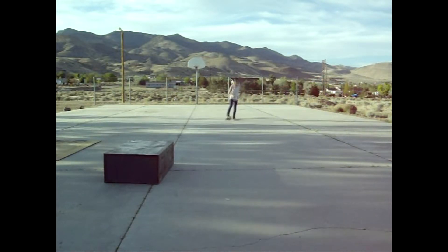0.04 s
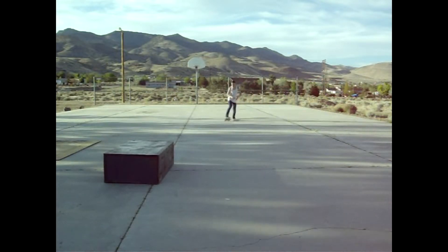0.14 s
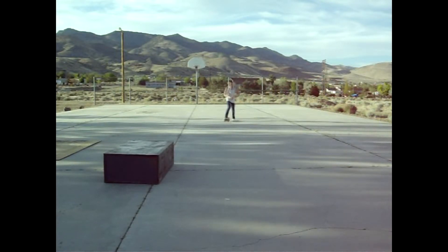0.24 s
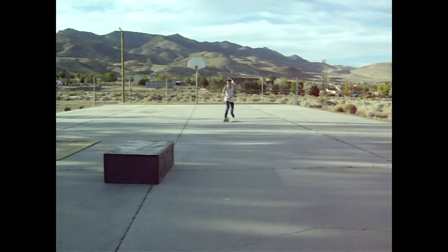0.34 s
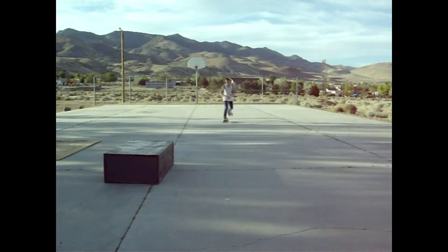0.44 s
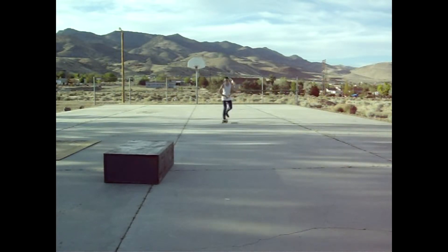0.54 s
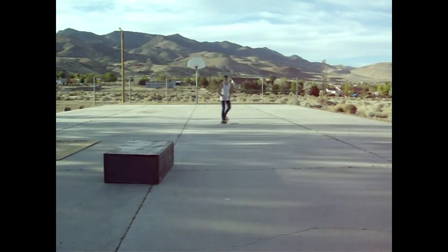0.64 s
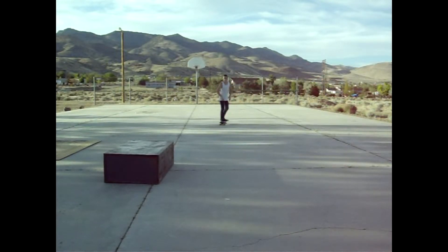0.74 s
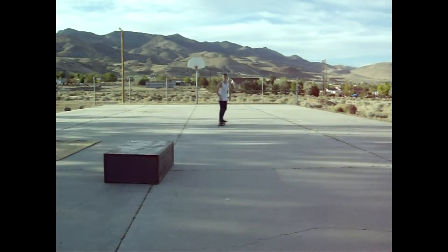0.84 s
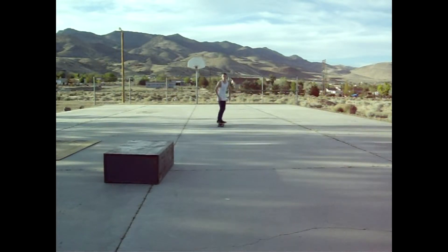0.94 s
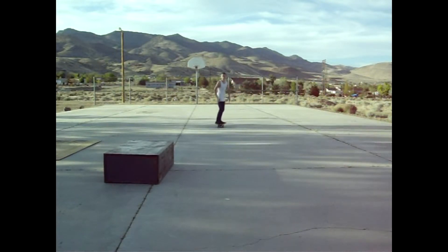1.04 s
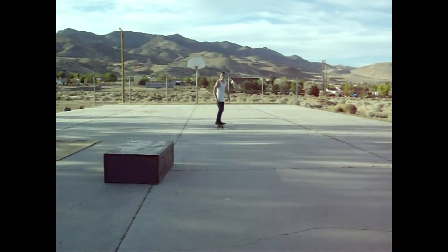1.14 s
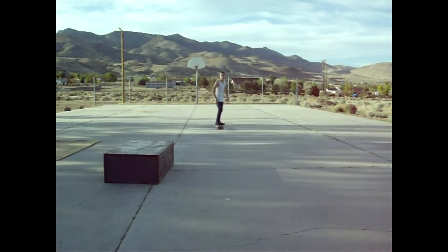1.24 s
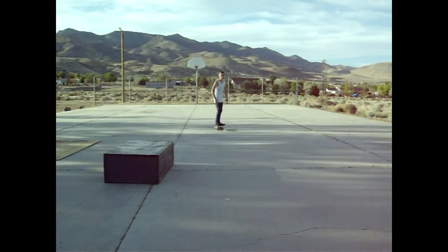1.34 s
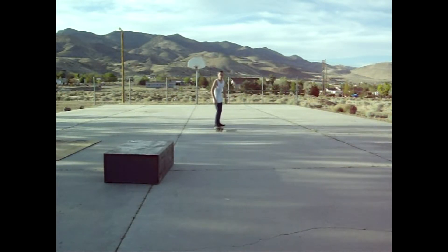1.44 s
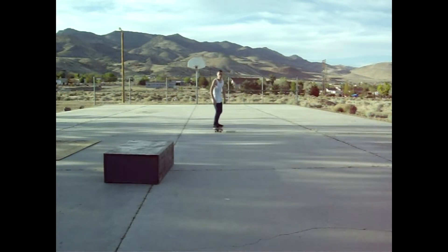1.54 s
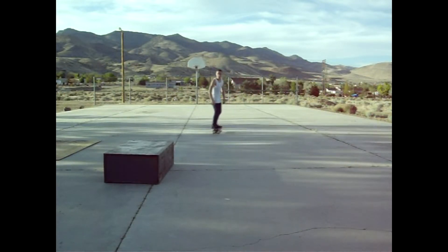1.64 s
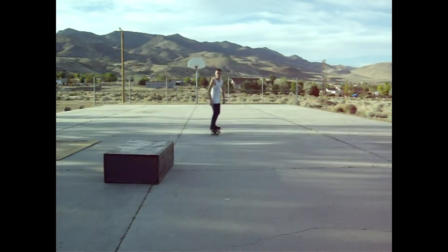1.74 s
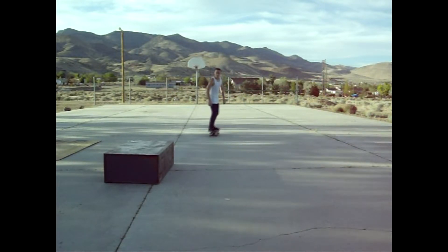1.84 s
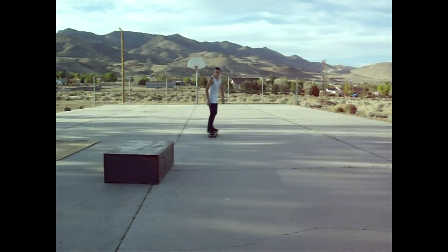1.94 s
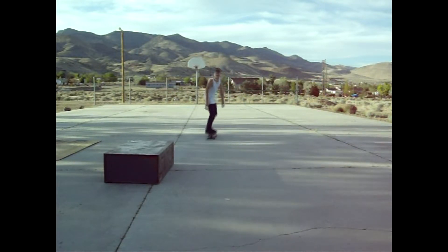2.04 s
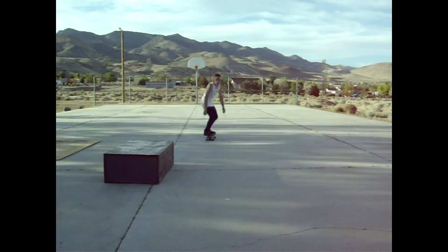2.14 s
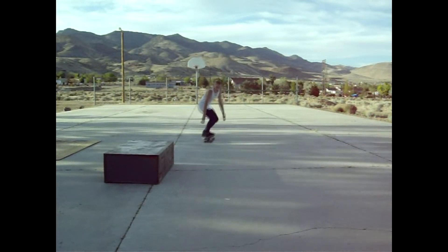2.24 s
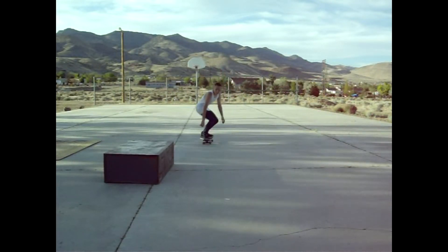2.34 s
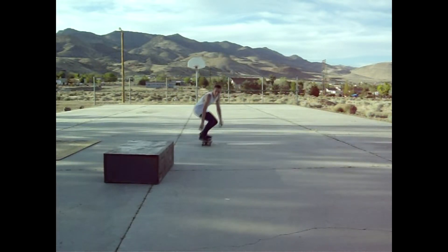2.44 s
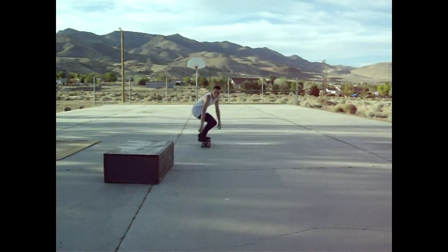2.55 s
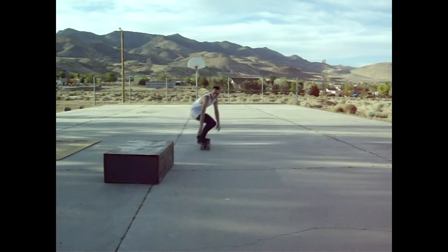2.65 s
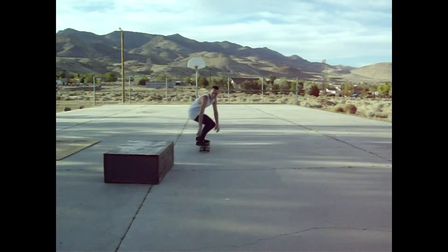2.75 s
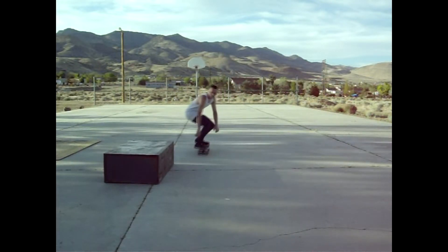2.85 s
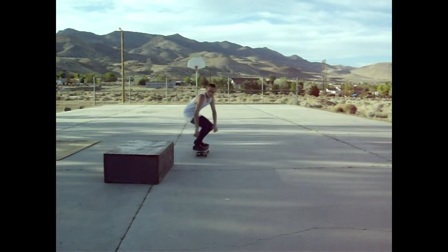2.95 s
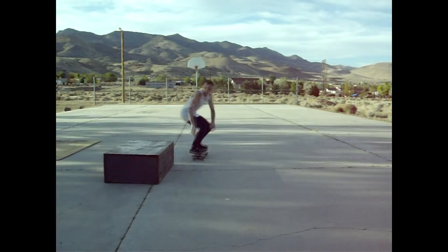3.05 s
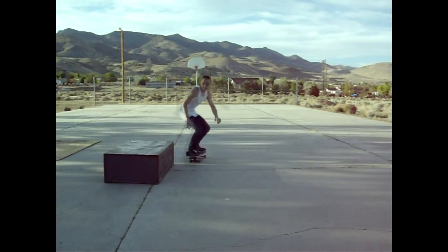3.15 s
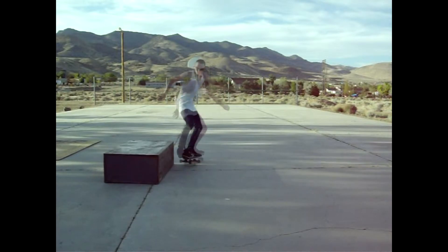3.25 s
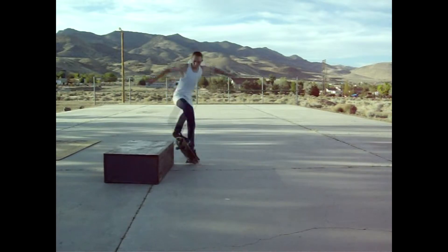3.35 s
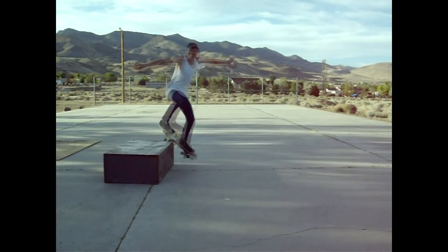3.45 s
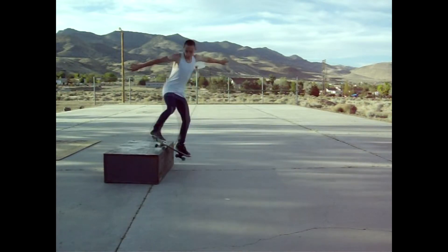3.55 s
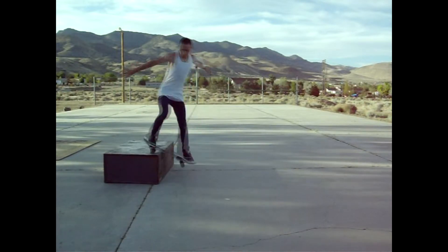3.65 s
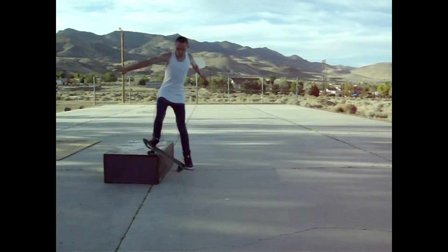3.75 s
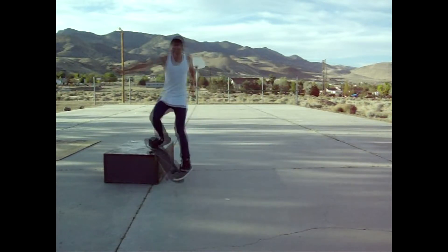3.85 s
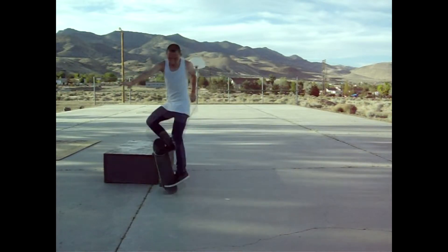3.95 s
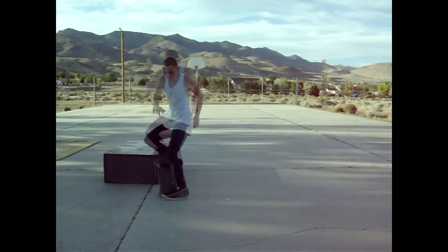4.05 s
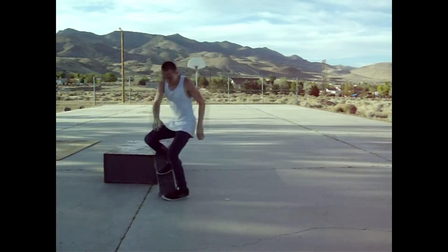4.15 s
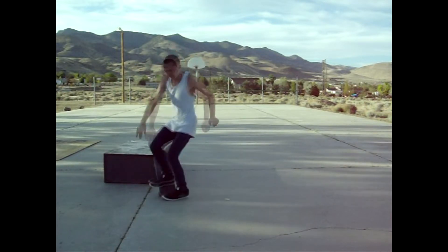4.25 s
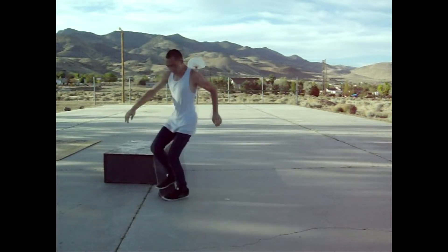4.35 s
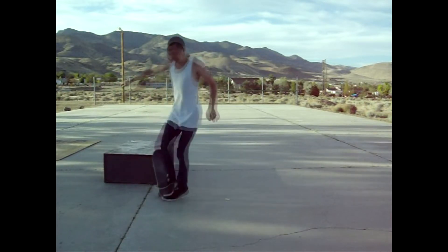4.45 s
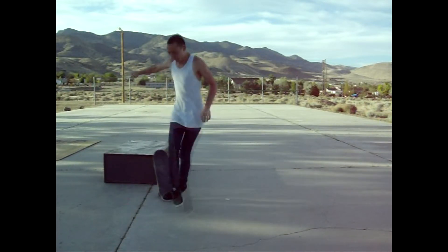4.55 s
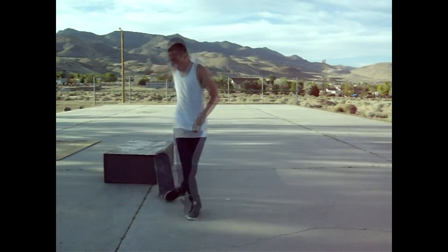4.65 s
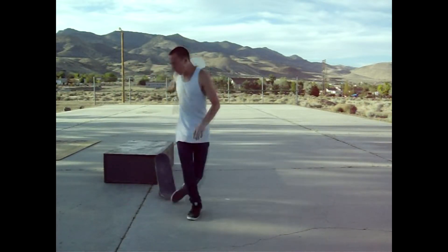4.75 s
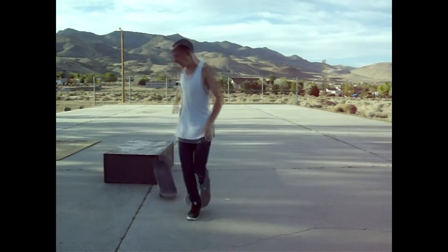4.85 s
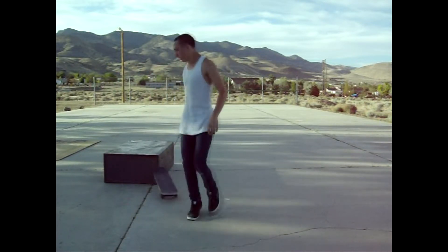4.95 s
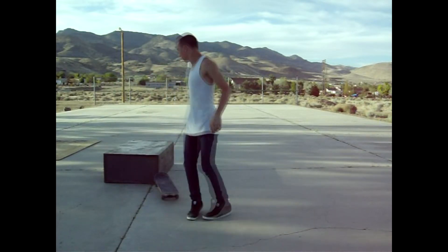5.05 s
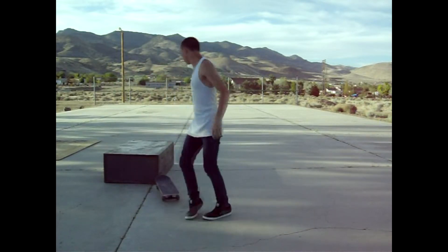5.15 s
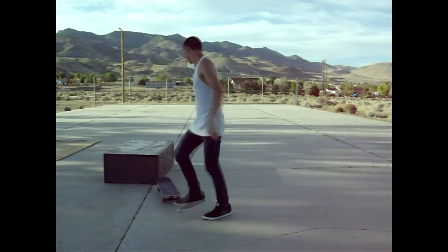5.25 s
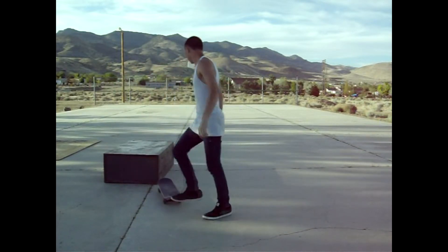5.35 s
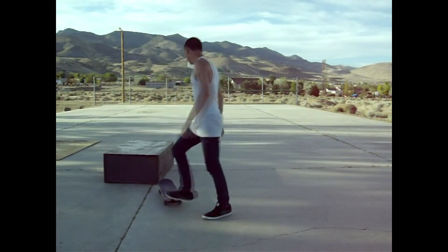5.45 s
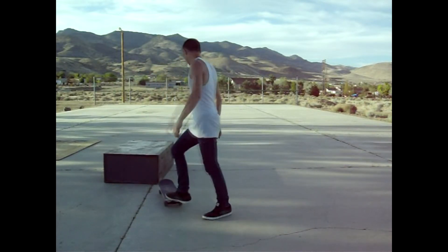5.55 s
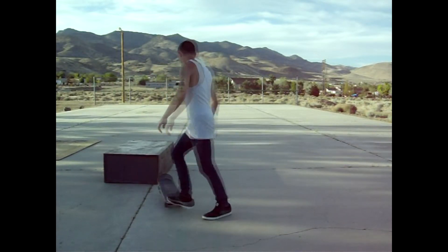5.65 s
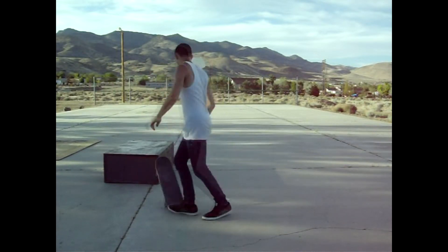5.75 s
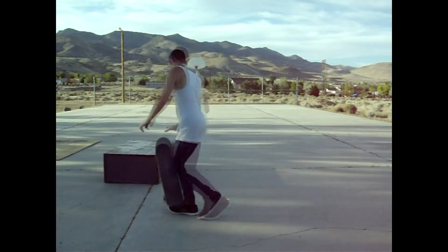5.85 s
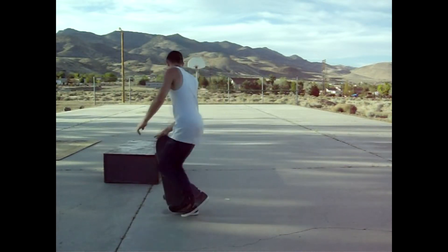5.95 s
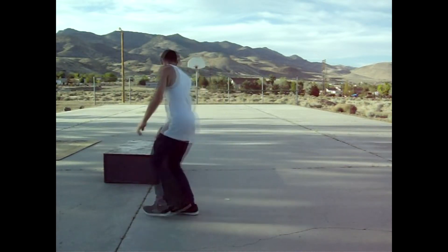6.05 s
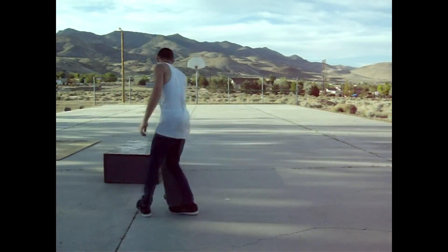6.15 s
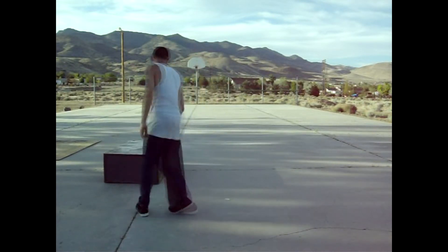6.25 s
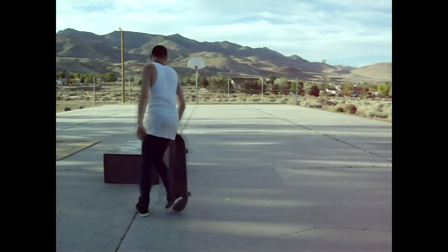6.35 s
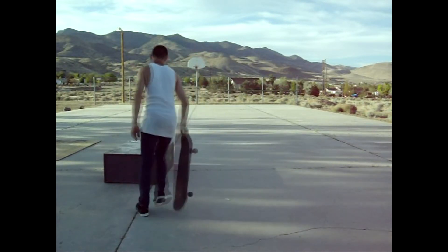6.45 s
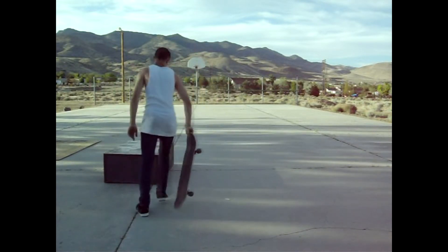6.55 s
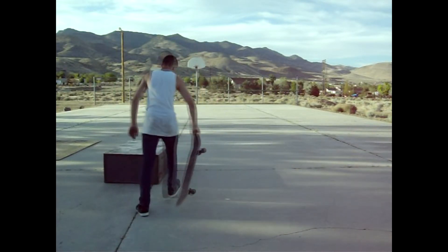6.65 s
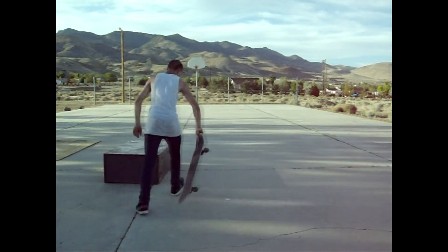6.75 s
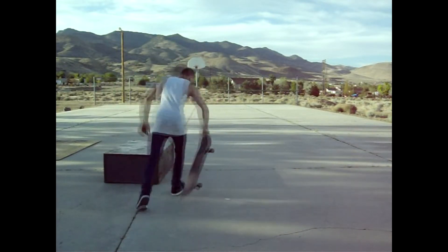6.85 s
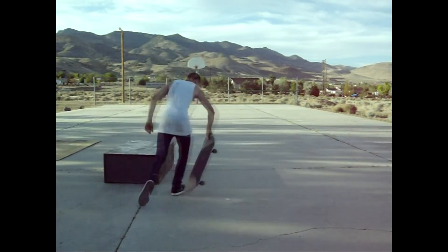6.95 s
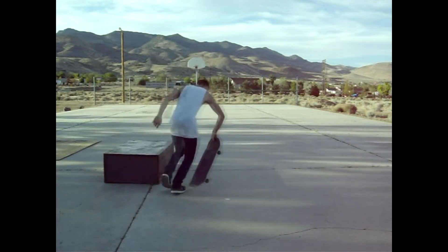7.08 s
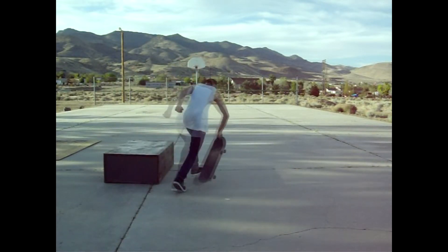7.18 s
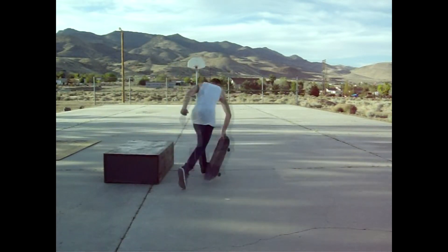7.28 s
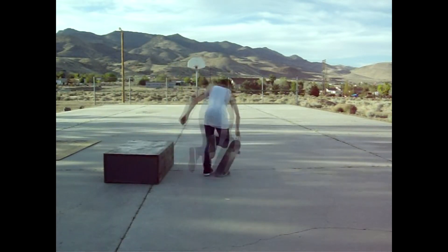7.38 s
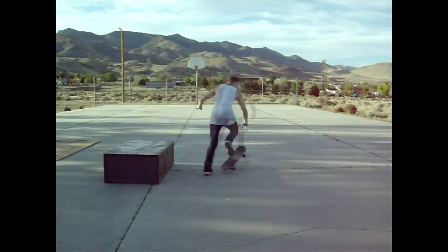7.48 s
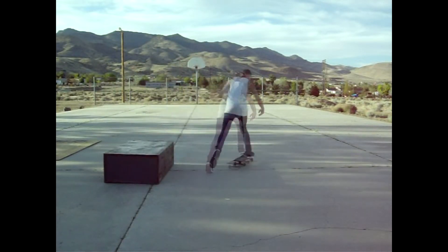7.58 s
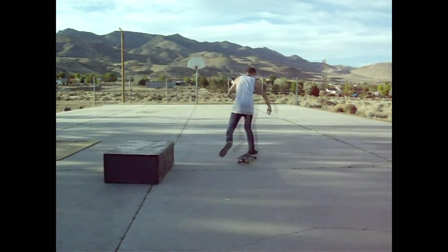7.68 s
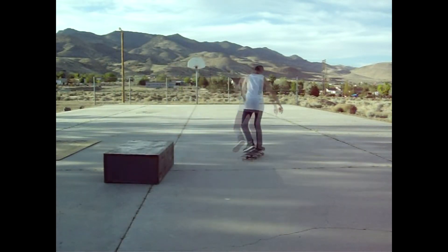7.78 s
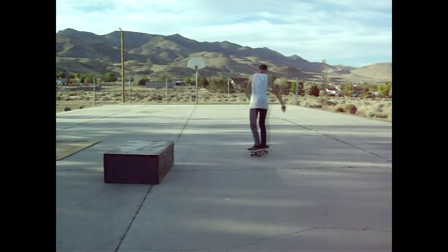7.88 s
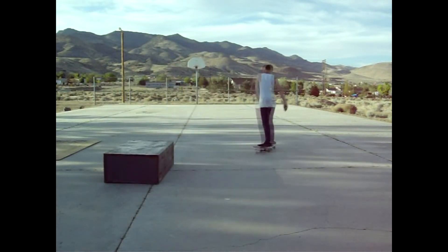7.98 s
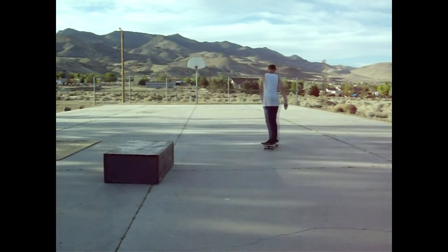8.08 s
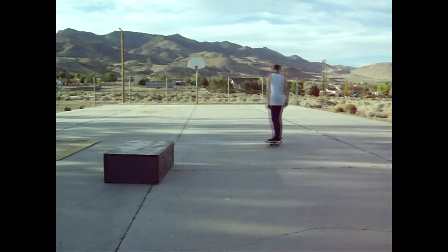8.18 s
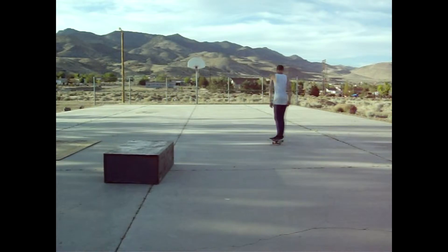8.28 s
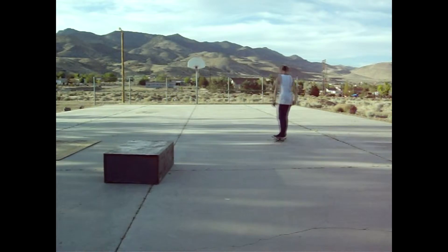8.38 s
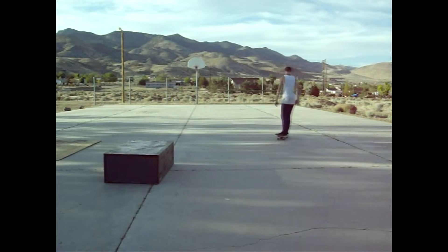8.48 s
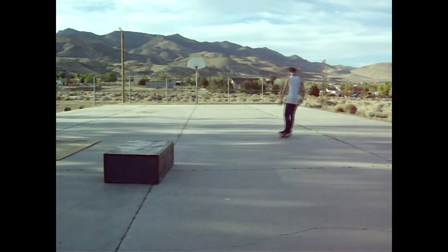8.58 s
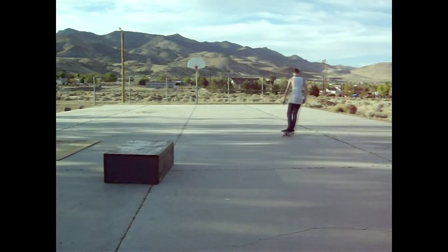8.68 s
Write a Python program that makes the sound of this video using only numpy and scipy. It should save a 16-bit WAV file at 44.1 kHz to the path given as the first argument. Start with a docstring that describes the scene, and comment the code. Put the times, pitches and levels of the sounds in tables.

```python
"""A concrete court in the open air: a skateboard rolls near, pops onto a wooden box, slips off and clatters.
The rider picks it up, throws it down and rolls away; wind buffets the microphone and a far dove coos.
Noise excites the deck's resonances for rolling and knocks; filtered noise makes grit, scrapes, wind and air.
Short swings make buffets, decaying sines the thuds and plain sines the dove; the microphone input overloads."""
import sys
import numpy as np
from scipy import signal
from scipy.fft import rfft, irfft
from scipy.io import wavfile
from scipy.ndimage import uniform_filter1d

SR = 44100
rng = np.random.default_rng(int(sys.argv[2]) if len(sys.argv) > 2 else 0)


def file_out(sig):
    """Save sig as 16-bit WAV at sys.argv[1]."""
    # one column per channel
    cols = np.atleast_2d(sig).T
    # limit, then scale
    lim = np.clip(cols, -1, 1)
    pcm = np.round(lim * 32767).astype(np.int16)
    wavfile.write(sys.argv[1], SR, pcm)


def volts_from_db(level):
    """Convert decibel levels to linear amplitude ratios."""
    exponent = np.asarray(level, float) / 20
    return 10 ** exponent


N = 384552

# relative spectrum of open air and of broad scuffs: frequency_hz, density_db
AIR_SPECTRUM = [(200, 0.5), (500, 1.5), (1000, -3), (2500, -5), (3800, 0.5), (4600, -12), (5400, -24),
                (7200, -23.5), (8200, -40), (10000, -67)]
# relative spectrum of grit and bright contact: frequency_hz, density_db
GRIT_SPECTRUM = [(1500, -3), (2500, 0), (3500, 3.5), (4400, -3.5), (5300, -21), (7200, -20.5), (8200, -35),
                 (9200, -37.5), (10200, -77)]


def evened(x):
    """Normalises the mean power: scales to rms 1."""
    return x / np.sqrt(np.mean(x ** 2) + 1e-20)


def add(mix, s, sound):
    """Superposition: mixes a sound in at time s (seconds)."""
    part = mix[round(s * SR):][:len(sound)]
    part += sound[:len(part)]


def coloured(x, points):
    """Linear filtering: weights the spectrum of x by a curve of (Hz, dB) points, without phase shift."""
    f, db = np.transpose(points)
    hz = np.fft.rfftfreq(len(x), 1 / SR)
    gain_db = np.interp(np.log(hz + 1), np.log(f + 1), db, -90, -90)
    return irfft(rfft(x) * volts_from_db(gain_db), len(x))


def band(x, lo_hz, hi_hz):
    """Causal band-pass filtering: passes the range between two frequencies."""
    return signal.sosfilt(signal.butter(2, [lo_hz, hi_hz], "bandpass", fs=SR, output="sos"), x)


def ring(x, hz, width_hz):
    """Resonance: two equal resonators in cascade give one steep peak."""
    peak = signal.iirpeak(hz, hz / width_hz, SR)
    return signal.lfilter(*peak, signal.lfilter(*peak, x))


def level(tables, column):
    """Amplitude envelope: gain over the whole scene from dB curves, silence outside them."""
    gain = np.zeros(N)
    for rows in tables:
        rows = np.array(rows)
        t = np.arange(rows[0, 0], rows[-1, 0], 1 / SR)
        add(gain, t[0], volts_from_db(np.interp(t, rows[:, 0], rows[:, column])))
    return uniform_filter1d(gain, size=130)


def lumpy(span_s, depth_db):
    """Random amplitude modulation: noise whose loudness wanders over span_s."""
    width = max(round(span_s * SR), 2)
    slow = uniform_filter1d(uniform_filter1d(rng.standard_normal(N), width), width)
    return evened(volts_from_db(depth_db * evened(slow)) * rng.standard_normal(N))


def dips():
    """Gain reduction: steady sounds sink at once at listed moments and recover at a constant rate in dB."""
    # sudden dips: time_s, depth_db
    sinks = [(0.299, 5.5), (0.552, 5.5), (1.098, 5.5), (2.201, 6), (3.43, 18), (3.62, 3), (4.78, 7.5),
             (4.93, 10), (5.36, 8), (5.83, 6), (6.08, 5), (7.47, 7.5), (7.7, 11.5)]
    recovery_db_per_s = 25
    t = np.arange(N) / SR
    each_db = [(t >= s) * (db - recovery_db_per_s * (t - s)) for s, db in sinks]
    down_db = np.max(each_db + [0 * t], axis=0)
    return uniform_filter1d(volts_from_db(-down_db), size=300)


def deck(x, widen, bed_db, load_db=0):
    """Modal resonance: the wooden deck rings at its modes above a broad rumble."""
    # modes of the deck: frequency_hz, width_hz (before widening), level_db, share of the load
    modes = [(442.5, 89, -8.5, 0.93), (828, 130, -8.5, 1), (1188, 122, -10.5, 1.1), (1730, 127, -12, -0.88),
             (1984, 110, -13, 0.81)]
    # relative spectrum of the rumble between the modes: frequency_hz, density_db
    bed = [(150, -14.5), (350, -12), (600, -5), (1000, -6.5), (1300, -2), (2050, -9), (2300, -22.5),
           (3000, -62.5)]
    out = volts_from_db(bed_db) * evened(coloured(x, bed))
    for hz, width_hz, db, share in modes:
        out = out + volts_from_db(db + share * load_db) * evened(ring(x, hz, widen * width_hz))
    return evened(out)


def rolling():
    """Roughness excitation: concrete shakes the wheels, so deck rumble and grit hiss share the same bumps."""
    # stretches of rolling, nearing then leaving: time_s, rumble_db
    stretches = [
        [(0, -23.5), (.08, -18.5), (.5, -21.5), (.68, -19.5), (.8, -16.5), (.9, -19.5), (1.33, -16.5),
         (1.41, -22), (1.62, -15.5), (1.95, -19), (2.1, -17), (2.5, -14.5), (3.0, -15), (3.26, -11),
         (3.33, -24), (3.415, -27.5)],
        [(7.7, -47), (7.88, -24.5), (7.95, -18), (8.1, -17.5), (8.4, -12), (8.72, -12)],
    ]
    # load on the deck, which shifts the balance of its modes: time_s, load_db
    load = [(0, -9), (1.901, -4.5), (2.4, 6), (3.413, 5.5), (7.7, 3.5), (8.72, -8.5)]
    pebbles_per_s, pebble_db = 49, 15.5  # single stones under the wheels
    # the hiss has hiss_db at a rumble of roll_db and follows a share of its changes
    hiss_db, hiss_follows, roll_db = -25, 0.55, -14
    # rolling away, a gap opens between the low and the middle rumble
    away_s, gap_hz, gap_width_hz, gap_share = 7.7, 854, 250, 0.84
    t = np.arange(N) / SR

    pebbles = rng.uniform(-1, 1, N) * (rng.random(N) < pebbles_per_s / SR)
    bumps = lumpy(0.01, 1.4) + volts_from_db(pebble_db) * pebbles
    rumble = deck(bumps, 1.18, 7.8, np.interp(t, *np.transpose(load)))
    gap = signal.lfilter(*signal.iirpeak(gap_hz, gap_hz / gap_width_hz, SR), rumble)
    rumble = rumble - gap_share * (t > away_s) * gap

    near = level(stretches, column=1)
    hiss = volts_from_db(hiss_db) * (near / volts_from_db(roll_db)).clip(0) ** hiss_follows
    return near * rumble + hiss * evened(coloured(bumps, GRIT_SPECTRUM))


def wind():
    """Turbulent pressure: a lumpy low flutter over a deep stir, and buffets of a few uneven swings."""
    # strength of the flutter: time_s, level_db
    flutter_levels = [(0, -31.5), (.6, -10), (.85, -19.5), (1.05, -12), (1.65, -27), (2.8, -26.5),
                      (3.25, -8.5), (3.33, -13), (3.41, -15), (3.44, -20), (3.85, -17.5), (4.3, -34),
                      (4.5, -21), (4.75, -17), (4.8, -34), (5.7, -34), (5.9, -55), (7.0, -36),
                      (7.75, -46.5), (8.15, -19.5), (8.72, -33)]
    # relative spectrum of the flutter: frequency_hz, density_db
    flutter_spectrum = [(20, -22.5), (75, -4.5), (150, 0.5), (260, -2), (450, -6.5), (750, -19.5),
                        (1400, -35), (2500, -80)]
    # strength of the deep stir: time_s, level_db
    stir_levels = [(0, -40), (2.3, -35.5), (3.6, -50.5), (5.2, -48.5), (5.7, -27.5), (6.0, -51.5),
                   (7.0, -28), (7.6, -48), (8.72, -34.5)]
    # single buffets on the microphone, begun 6 ms before: time_s, peak_db
    jolts = [(0.234, 6.5), (0.446, -3.5), (0.516, -1.5), (0.545, 3), (0.612, 1), (0.935, 6.5), (1.06, -7),
             (1.379, -2), (1.514, 0), (2.928, -2.5), (3.106, -3), (3.231, -2.5), (3.308, -1.5), (3.35, -1),
             (3.373, -1), (3.398, 0), (4.476, -15), (4.539, -2.5), (4.581, -13), (4.612, -1), (4.635, -7),
             (4.725, 0), (4.745, -5), (5.393, -18.5), (5.616, -14.5), (5.642, -9), (6.345, -21),
             (6.952, -17), (7, -6.5), (8.101, -9.5), (8.145, -9)]
    buffet_s, spiky = 0.044, 1.7  # spiky makes the largest swings stand out as jolts

    flutter = level([flutter_levels], column=1) * evened(coloured(lumpy(0.015, 4.1), flutter_spectrum))
    stir = level([stir_levels], column=1) * evened(band(lumpy(0.041, 0.93), 33, 130))
    out = dips() * (flutter + stir)

    t = np.arange(0, buffet_s, 1 / SR)
    window = np.sin(np.pi * (t / buffet_s) ** 0.46) ** 2  # quick rise, slower fall
    for s, db in jolts:
        pitch, phase = rng.random((2, 4, 1))
        hz = np.array([[90], [150], [240], [400]]) * (1 + .4 * pitch)  # eddies of four sizes pass together
        eddies = volts_from_db([[-3], [0], [-4], [-12]]) * np.sin(2 * np.pi * (hz * t + phase))
        swing = eddies.sum(0) * window
        jolt = np.sinh(spiky * swing / abs(swing).max()) / np.sinh(spiky)
        add(out, s - .006, volts_from_db(db) * jolt)
    return out


def knocks():
    """Impact excitation: bursts of rattling contact drive deck and crack; heavy blows add decaying sines."""
    # knocks of board, wheels and shoes: time_s, deck_db, crack_db
    blows = [(1.082, 0, -17), (1.889, 4.5, -17), (2.063, 4.5, -18.5), (2.099, -9, -23), (2.162, 2.5, -21),
             (3.411, -3, -13.5), (3.585, -1, -15.5), (3.601, -11, -14.5), (3.791, -18, -21),
             (3.97, -3, -15), (4, -2.5, -12), (4.065, -3, -11.5), (4.078, -2, -12), (4.141, -15, -26.5),
             (4.197, -14.5, -31), (4.28, -19.5, -40), (4.39, -14, -33.5), (4.684, -7, -32), (4.7, -27, -22),
             (4.768, -11.5, -16.5), (4.854, -5, -24), (4.95, -14, -20), (5.069, 0, -14.5),
             (5.236, 2.5, -18.5), (5.307, -4.5, -23), (5.342, -23, -28.5), (5.363, -19, -40),
             (5.428, -14.5, -45), (5.47, -15, -35), (5.525, -19, -47), (5.578, -13, -32.5),
             (5.626, -14, -36), (5.664, -18.5, -40), (5.817, -2.5, -16.5), (5.855, -14.5, -28.5),
             (6.052, -15.5, -32.5), (6.23, -47, -34), (6.8, -15, -32), (7.382, -12, -44), (7.489, 0, -13.5),
             (7.593, -10, -19.5), (7.618, 3, -15), (7.663, -16, -29), (7.683, 2.5, -17)]
    # heavy blows that also thud low in the box or the ground: time_s, peak_db, pitch_hz
    heavy = [(1.892, 3.5, 526), (3.413, 0.5, 304), (4.081, -8.5, 413), (4.684, -0.5, 750),
             (5.067, -6.5, 320), (5.816, -11, 406), (7.382, -9, 524), (7.485, -5, 308)]
    thud_cycles = 7.3  # to fall by 60 dB
    snap_db, snap_t60_s = -1, 0.013  # the first contact stands out over the rattle
    t = np.arange(SR // 3) / SR

    thuds = np.zeros(N)
    for s, db, hz in heavy:
        add(thuds, s, np.sin(2 * np.pi * hz * t) * volts_from_db(db - 60 * t * hz / thud_cycles))

    # each drive has a quick and a slow decay, given by their times to fall 60 dB
    deck_decay = volts_from_db(-13.0 - 60 * t / 0.053) + volts_from_db(-41.5 - 60 * t / 1.5)
    crack_decay = volts_from_db(0.5 - 60 * t / 0.042) + volts_from_db(-24.5 - 60 * t / 0.35)
    contact = np.minimum(t / 0.0012, 1) * (1 + volts_from_db(snap_db - 60 * t / snap_t60_s))
    drive = np.zeros((2, N))
    for s, deck_db, crack_db in blows:
        rattle = rng.standard_normal(len(t)) * contact
        add(drive[0], s, rattle * volts_from_db(deck_db) * deck_decay)
        add(drive[1], s, rattle * volts_from_db(crack_db) * crack_decay)

    # impulse responses; the onset removes what the phase-free filter puts ahead of the click
    click = signal.unit_impulse(4096, 1024)
    onset = np.sin(np.pi / 2 * np.clip((np.arange(4096) - 960) / 64, 0, 1)) ** 2
    bodies = [deck(click, 9.0, 31) * onset, coloured(click, GRIT_SPECTRUM)]
    out = thuds
    for force, body in zip(drive, bodies):
        out = out + signal.oaconvolve(force, body / np.linalg.norm(body))[1024:N + 1024]
    return out


def open_air():
    """Ambient noise: many distant sources blend into a gently wandering, coloured hush."""
    # background strength: time_s, level_db
    hush_levels = [(3.3, -28.5), (4.3, -43), (5.2, -38), (6.2, -43.5), (6.7, -38.5), (7.2, -34),
                   (8.0, -31.5)]
    return level([hush_levels], column=1) * evened(coloured(lumpy(0.034, 0.55), AIR_SPECTRUM))


def scrapes():
    """Stick-slip friction: dense slips make scuff and rasp; a rocking board adds resonant, hollow chatter."""
    # grip tape, shoe or tail swells to a peak and breaks off:
    # start_s, peak_s, peak_db, swell_db, rasp_db (relative to the scuff)
    rubs = [(3.636, 3.877, -25.5, 11, -11), (3.889, 3.998, -17, 12, -33), (4.69, 4.773, -29, 4, -23),
            (5.786, 5.817, -10, 42, -26), (6.717, 6.774, -32, 23, -2), (7.27, 7.308, -28.5, 17, -19),
            (7.403, 7.458, -20.5, 14.5, 4)]
    # the loose board rocks on its wheels after a blow: start_s, length_s, level_db, pitch_hz
    rattles = [(4.062, 0.29, -32, 1950), (4.875, 0.059, -28, 1700), (4.969, 0.23, -23, 1800),
               (5.068, 0.17, -21, 1710), (5.241, 0.11, -18, 1700), (5.31, 0.18, -22.5, 1530),
               (5.465, 0.089, -25, 1600), (7.496, 0.23, -18, 1350)]
    stop_s = 30 / 891  # from peak to break-off
    rattle_fade_db = 21.5  # lost by the end of each

    slips, chatter = lumpy(0.0012, 1.2), lumpy(0.0039, 3.6)
    strokes = []  # time, scuff dB, rasp dB
    for s, peak, db, swell_db, rasp_db in rubs:
        strokes.append([(s, db - swell_db, db - swell_db + rasp_db),
                        (peak, db, db + rasp_db),
                        (peak + stop_s, db - 43, db - 50)])
    grit = coloured(slips, GRIT_SPECTRUM)
    scuff = evened(coloured(slips, AIR_SPECTRUM))
    rasp = evened(grit + 1.5 * ring(grit, 3570, 1400))
    out = level(strokes, column=1) * scuff + level(strokes, column=2) * rasp

    loose = volts_from_db(-5) * deck(chatter, 0.27, 3.9) + volts_from_db(-4.0) * evened(coloured(chatter, GRIT_SPECTRUM))
    for s, length, db, hz in rattles:
        part = slice(round(s * SR), round((s + length) * SR))
        hollow = evened(ring(chatter[part], hz, 960)) + loose[part]
        fade = volts_from_db(np.linspace(db, db - rattle_fade_db, len(hollow)))
        add(out, s, evened(hollow) * fade)
    return out


def dove():
    """Pure tones: three soft sine notes from far away, each with a rounded start and end."""
    # notes: start_s, end_s, pitch_hz, level_db
    notes = [(6.2, 6.278, 473, -48), (6.29, 6.554, 538, -44.5), (6.56, 7.007, 481, -41)]
    out = np.zeros(N)
    for start, end, hz, db in notes:
        t = np.arange(0, end - start, 1 / SR)
        add(out, start, volts_from_db(db) * np.sin(2 * np.pi * hz * t) * signal.windows.tukey(len(t), .4))
    return out


def scene():
    """Superposition: everything reaches one microphone in the open air."""
    steady = dips() * (rolling() + open_air() + dove())
    return (steady + scrapes() + knocks() + wind())[None]


def roll_off(x):
    """The treble ends steeply here."""
    return signal.sosfilt(signal.butter(12, 16000, fs=SR, output="sos"), x)


def record(dry):
    """Saturation and low-pass filtering: the input overloads, treble is lost, rare overshoots clip."""
    overloaded = np.clip(dry, -.97, .97)
    dull = signal.sosfilt(signal.butter(8, 9500, fs=SR, output="sos"), overloaded)
    hiss = volts_from_db(-99.0) * rng.standard_normal(dry.shape)
    finished = np.clip(dull + hiss - .003, -1, 1)  # with a small constant offset
    return roll_off(finished)


dry = scene()
out = record(dry)
file_out(out)
```